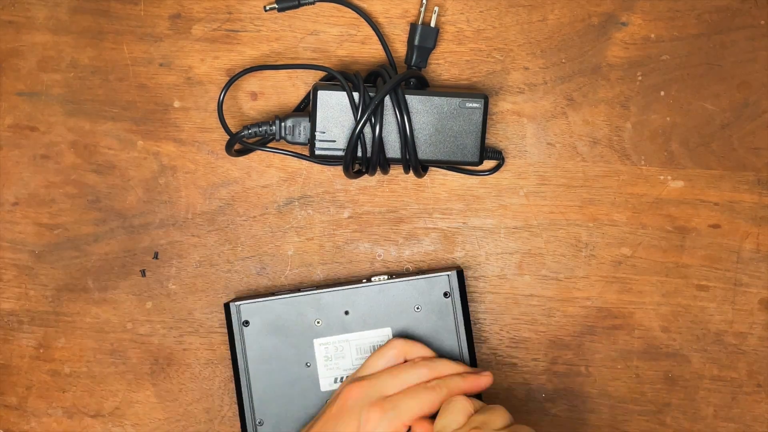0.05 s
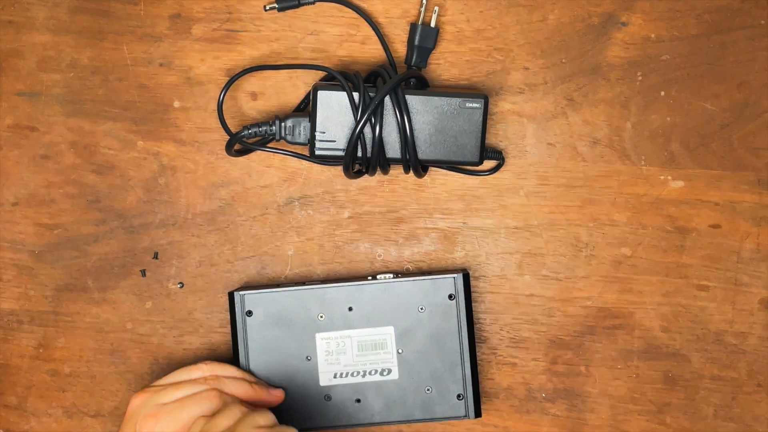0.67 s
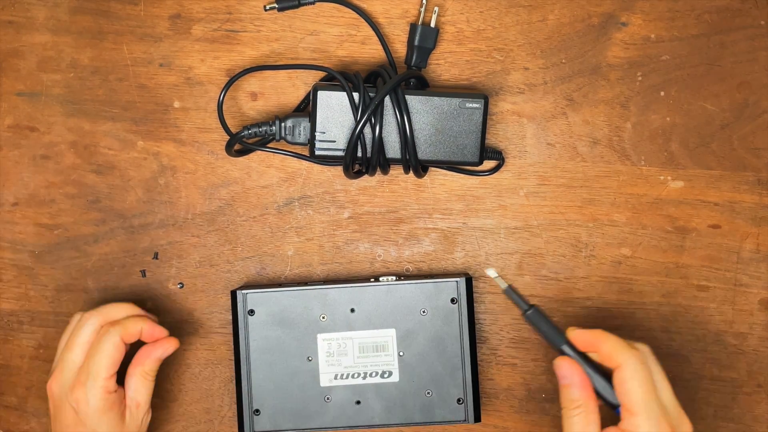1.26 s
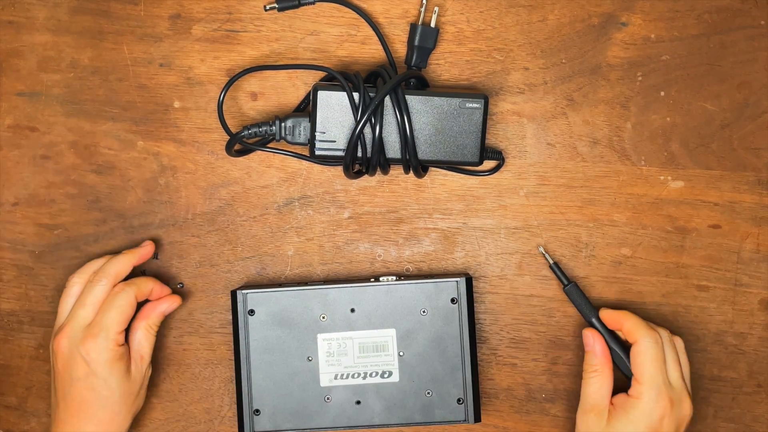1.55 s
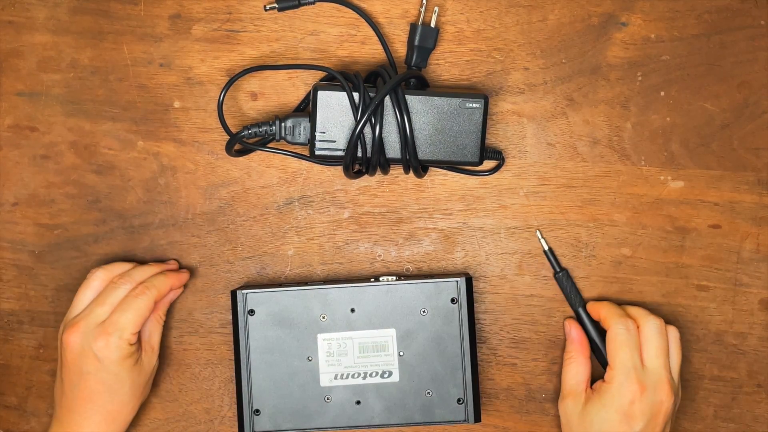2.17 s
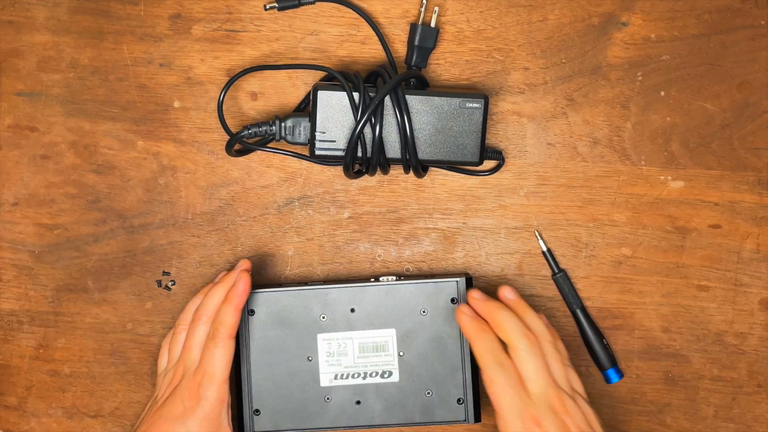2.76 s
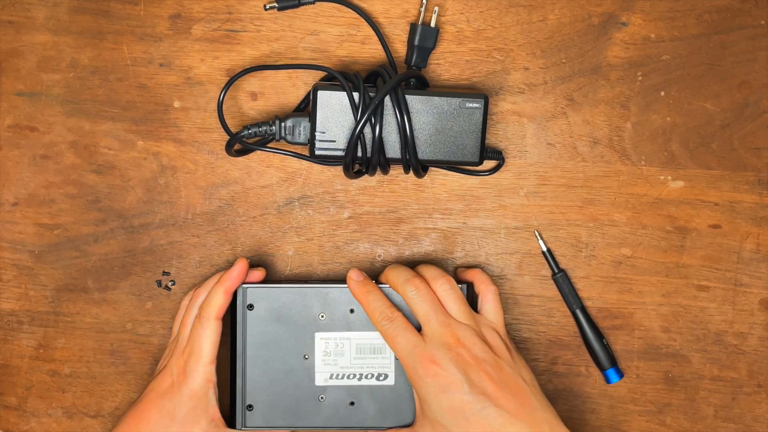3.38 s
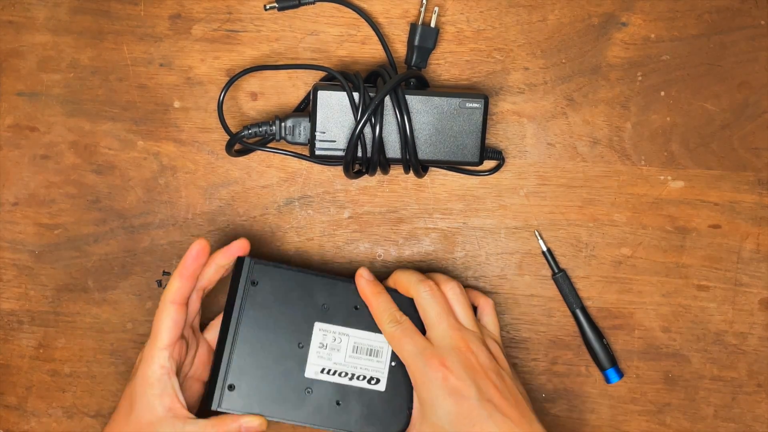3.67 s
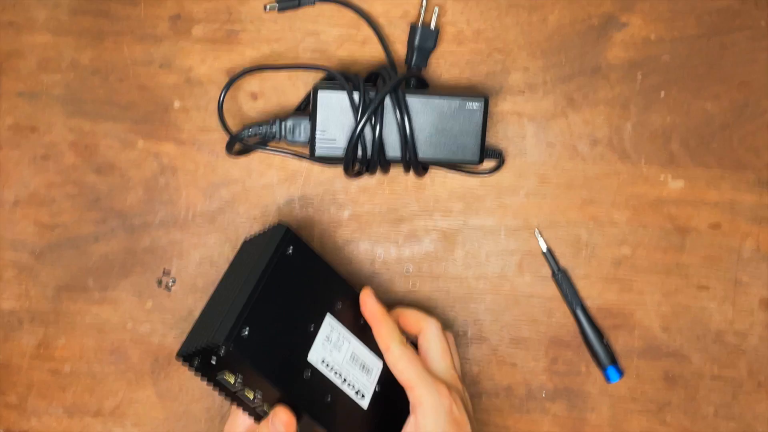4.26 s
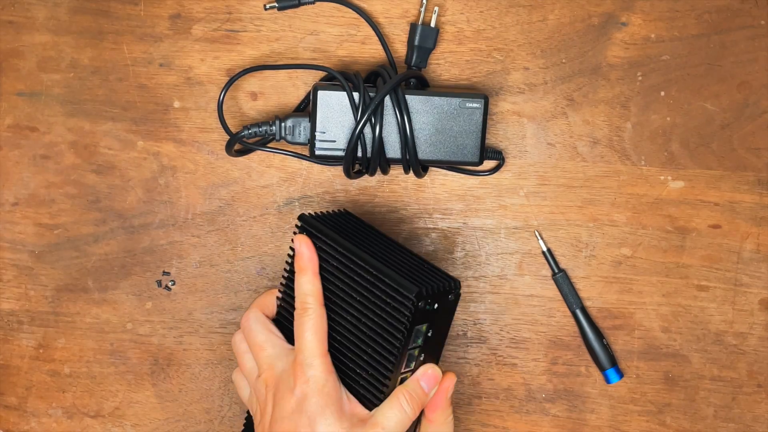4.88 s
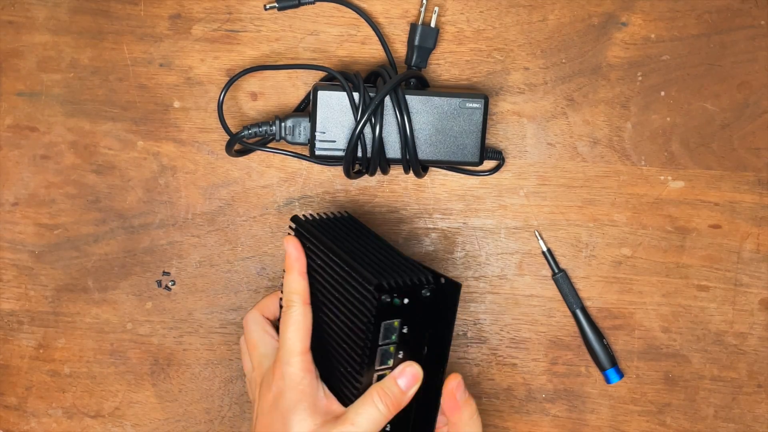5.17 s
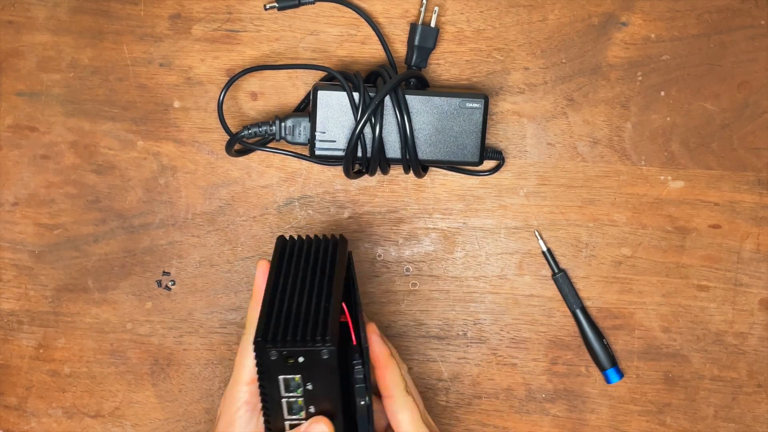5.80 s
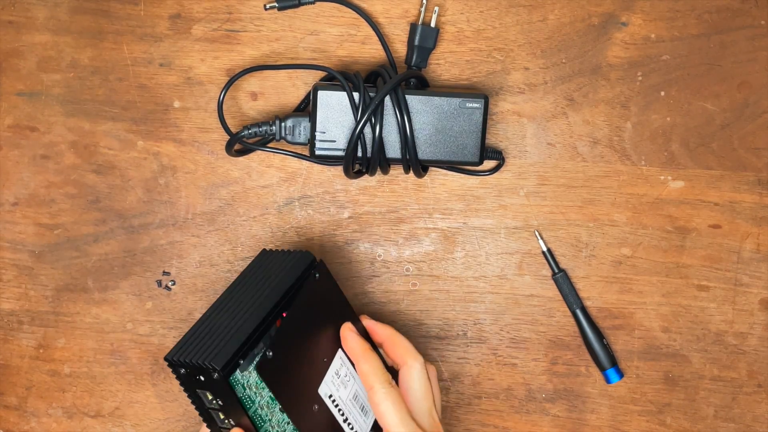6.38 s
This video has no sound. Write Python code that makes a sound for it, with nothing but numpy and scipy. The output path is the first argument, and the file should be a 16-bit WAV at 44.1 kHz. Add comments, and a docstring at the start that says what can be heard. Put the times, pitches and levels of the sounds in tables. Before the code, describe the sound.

Close up in a quiet room, small screws skitter over a wooden tabletop among light finger taps on a metal case. The loudest sound follows, a screwdriver knocking onto the wood. Then the case bumps on its feet, sticks and slips across the table and groans once, shortly, as it tilts. Dry skin brushes the shell, and a thin bottom plate comes free in a run of small scrapes and sharp, ringing clicks.

```python
"""A small finned metal computer case is taken apart on a wooden table, close up in a quiet room.
Fingers rub and tap its shell; screws and a screwdriver slide and knock on the wood, ringing the table top.
Pushed along, the case sticks and slips in a judder, then groans once as it is tipped up.
Last, its loose bottom plate scrapes and clicks out of the shell with the ring of thin sheet metal."""
import sys
import numpy as np
from scipy import signal
from scipy.fft import rfft, irfft, next_fast_len
from scipy.io import wavfile
from scipy.ndimage import map_coordinates

SR = 44100
rng = np.random.default_rng(int(sys.argv[2]) if len(sys.argv) > 2 else 0)


def generate_wav(sig):
    """Save sig (samples, or channels by samples) to the path in sys.argv[1] as 16-bit PCM at SR."""
    pcm = np.round(np.clip(np.atleast_2d(sig).T, -1, 1) * 32767).astype(np.int16)
    wavfile.write(sys.argv[1], SR, pcm)


N = 288414

# dark bed of room air: (frequency [Hz], level [dB]); table levels are relative, each layer has its own trim
AIR_SPECTRUM = [(20, -18.5), (45, 0), (75, 3.5), (130, 2.5), (250, -1), (500, -8), (900, -14), (1400, -15),
                (2200, -24), (5000, -29.5), (9000, -34.5), (15000, -36)]
# screws and screwdriver sliding on the wood: (start [s], length [s], level [dB])
PART_SLIDES = [(0.0, 0.2, -57.5), (0.197, 0.03, -51), (0.236, 0.024, -48), (0.27, 0.084, -59),
               (0.558, 0.021, -42.5), (0.755, 0.013, -46), (0.866, 0.13, -47), (1.058, 0.081, -59),
               (2.01, 0.17, -61.5), (2.12, 0.02, -53)]
# body of those slides: (frequency [Hz], bandwidth [Hz], level [dB])
SLIDE_MODES = [(416, 49, 11), (810, 48, 7), (950, 88, -5.5), (1240, 230, -9), (1520, 170, -9.5),
               (2820, 320, -20), (4516, 300, -29)]
# strokes of skin over the case: (centre [s], level [dB], half width [s])
SKIN_STROKES = [(0.01, -49.5, 0.011), (0.06, -59, 0.015), (0.29, -68.5, 0.046), (0.598, -58.5, 0.015),
                (0.665, -62, 0.025), (1.70, -69.5, 0.038), (1.79, -65, 0.025), (1.96, -66, 0.042),
                (2.58, -75, 0.12), (2.69, -60, 0.021), (2.77, -60, 0.052), (2.90, -75, 0.11),
                (3.06, -57.5, 0.049), (3.16, -73, 0.03), (3.52, -63, 0.045), (3.94, -64.5, 0.067),
                (4.13, -75, 0.033), (4.29, -52, 0.032), (4.45, -69, 0.011), (4.61, -69, 0.064),
                (4.99, -65.5, 0.038)]
# dry friction hiss: (frequency [Hz], level [dB])
HISS_SPECTRUM = [(200, -8.5), (900, -0.5), (2000, 4.5), (3500, 1.5), (5500, -2.5), (7500, -4.5),
                 (10000, -9.5), (13000, -16.5), (15500, -8)]
# airy whisper of fingertips creeping over the fins: (frequency [Hz], level [dB])
CREEP_SPECTRUM = [(3000, -27), (6500, -10), (8000, -0.5), (10500, -4), (13000, -7.5), (15500, -1)]
# hands shifting their grip: (start [s], length [s], level [dB])
GRIP_SHIFTS = [(2.418, 0.36, -66.5), (2.661, 1.35, -62.5), (4.375, 0.65, -68)]
# fingers landing on the case: (time [s], level [dB], thump offset [dB], nail offset [dB])
FINGER_TAPS = [(0.043, -44, -2.5, -11), (0.1519, -57, 16, -42), (0.2528, -46.5, 2.5, -24),
               (0.5582, -54.5, 14, -47), (0.607, -36, 7.5, -22), (0.624, -40.5, 2, -11),
               (0.7567, -55.5, 14, -26), (1.9016, -47.5, -27.5, -17.5), (1.9162, -43.5, -31.5, 2.5),
               (2.414, -50, -3, -7), (2.6486, -39, 5.5, -36), (2.7186, -35.5, 3, -26.5),
               (3.0075, -25, -4, -23), (4.7339, -41.5, -12, -35), (4.799, -50, 4.5, -38),
               (4.9405, -30, -8, -6), (5.288, -47.5, -26, -18), (5.317, -56, -21, -8),
               (5.3538, -44, -3.5, -27)]
# snap of a light contact, fingertip or screw: (frequency [Hz], level [dB])
SLAP_SPECTRUM = [(200, -7.5), (900, -1.5), (2000, 1), (3500, -2.5), (5500, -11.5), (7500, -10),
                 (10000, -15), (13000, -24.5), (15500, -19)]
# thump of the case under a finger: (frequency [Hz], bandwidth [Hz], level [dB])
THUMP_MODES = [(256, 55, -2.5), (413.5, 9.3, -3), (565, 190, -6.5), (789, 160, -1), (938, 30, -1),
               (1286, 51, -7.5)]
# bright edge of a fingernail: (frequency [Hz], level [dB])
NAIL_SPECTRUM = [(500, -26), (2500, -11), (5000, 12), (7500, 13), (10000, 8.5), (13000, -2.5),
                 (15500, -0.5)]
# screwdriver and case hitting the table: (time [s], level [dB], contact time [s], gate length [s])
TABLE_KNOCKS = [(0.2420, -39.5, 0.0015, 0.048), (0.57, -39, 0.00042, 0.016), (0.6224, -29.5, 0.00026, 0.18),
                (1.1491, -28, 0.0015, 0.011), (1.1590, -31, 0.0022, 0.0088), (2.1865, -11.5, 0.00067, 0.36),
                (2.2001, -21, 0.0014, 0.38), (2.2116, -34.5, 0.0022, 0.26), (3.0130, -34, 0.0014, 0.126),
                (4.2328, -36.5, 0.00073, 0.091), (4.2775, -33, 0.0016, 0.082), (4.364, -41, 0.0035, 0.087)]
# ring of the table top: (frequency [Hz], level [dB], t60 [s])
WOOD_MODES = [(262, -31.5, .05), (385, -14, 0.041), (662, -16, 0.06), (722.4, -11.5, 0.055),
              (813.5, -6, 0.068), (891, -12, 0.13), (1114, 1, 0.028), (1340, -0.5, 0.025), (1450, 0, 0.03),
              (1560, 0, 0.017), (1788, -9, 0.058), (2110, -5, 0.02), (2360, -12, 0.022), (2600, -3, 0.062),
              (2913, -13.5, 0.067)]
# crack of the wood's dense weak modes: (frequency [Hz], level [dB])
CRACK_SPECTRUM = [(150, -11), (400, -3), (800, -2), (1500, 0.5), (2700, -8), (3300, -24), (5500, -28),
                  (7500, -42.5), (12000, -43.5), (15500, -39.5)]
# boom of the whole table flexing: (frequency [Hz], bandwidth [Hz], level [dB])
BOOM_MODES = [(75.5, 18, -4), (137, 25, -4.5)]
# ticks that stop dead: (time [s], level [dB], length [s])
DRY_TICKS = [(0.5087, -63.5, 0.0016), (0.709, -42.5, .005), (0.8580, -71, 0.0014), (1.062, -69, 0.0016),
             (1.125, -68.5, 0.0068), (1.1660, -53.5, .002), (3.816, -63, .004)]
# their tone: (frequency [Hz], level [dB])
TICK_SPECTRUM = [(200, 2), (2000, 8.5), (6000, 3), (10000, 6), (15000, -15.5)]
# the case pushed over the wood: (start [s], length [s], effort [dB])
CASE_PUSHES = [(0.618, 0.033, -41.5), (3.19, 0.34, -51), (3.42, 0.21, -43.5), (3.855, 0.11, -44),
               (4.335, 0.027, -47)]
# body of the case standing on the table: (frequency [Hz], bandwidth [Hz], level [dB])
CASE_MODES = [(348.6, 43.4, 0.5), (408, 46.3, 0.5), (634, 45, -8), (740, 28, -5.5), (914, 57, -8.5),
              (1256, 44, -16.5), (1600, 120, -23)]
# gritty ring of its fins: (frequency [Hz], bandwidth [Hz], level [dB])
FIN_MODES = [(1945, 250, -6), (2380, 150, 0), (2670, 62, 5.5), (3167, 100, 3.5), (3440, 200, -7),
             (3820, 360, -10.5), (4330, 220, -11), (4920, 180, -9), (5320, 130, -10.5)]
# handling rumble through the table: (frequency [Hz], level [dB])
RUMBLE_SPECTRUM = [(30, -12), (70, 2.5), (120, 3), (200, -2), (330, -1.5), (550, -6), (800, -16),
                   (1500, -21.5), (4000, -50)]
# the case rocking on its feet: (time [s], level [dB])
FOOT_BUMPS = [(0.646, -38), (0.672, -50.5), (2.834, -47), (2.879, -45), (2.914, -41.5), (2.948, -47.5),
              (3.072, -47.5), (3.115, -49), (3.748, -54), (4.109, -47)]
# dull body of a bump: (frequency [Hz], bandwidth [Hz], level [dB])
BUMP_MODES = [(114, 63, -36.5), (410, 326, 3.5), (605, 142, 4.5)]
# a screw set down: (time [s], level [dB])
SCREW_HITS = [(1.6287, -39)]
# ring of the screw on the wood: (frequency [Hz], level [dB], t60 [s])
SCREW_MODES = [(432, 5, 0.17), (1056, -1.5, 0.12), (1770, -26, 0.088), (2480, -26, .08), (3040, -4, 0.096),
               (3040, -6, 0.083), (2750, -2, 0.11), (3800, -12, 0.1), (6200, -17, 0.22)]
# the bottom plate scraping: (centre [s], level [dB], half width [s])
PLATE_SCRAPES = [(5.185, -57, 0.023), (5.575, -52, 0.021), (5.718, -54.5, 0.0053), (5.818, -46, 0.0136),
                 (5.91, -57, 0.0132), (6.063, -45.5, 0.0135), (6.29, -54, 0.024), (6.382, -51.5, 0.017)]
# the plate catching in the shell: (time [s], level [dB], t60 [s])
PLATE_CLICKS = [(5.7001, -45, 0.026), (5.7317, -23.5, 0.015), (5.7975, -41.5, 0.054), (6.051, -53, 0.021),
                (6.0760, -41, 0.025), (6.1655, -30, 0.0235), (6.2065, -45, 0.038), (6.2711, -39.5, 0.013),
                (6.4878, -41, 0.019)]
# the freed plate rubbing faintly: (start [s], length [s], level [dB])
PLATE_SHIFTS = [(5.75, 0.147, -66.5), (6.07, 0.062, -69), (6.25, 0.2, -66)]
# ring of its thin sheet: (frequency [Hz], bandwidth [Hz], level [dB])
PLATE_MODES = [(981, 17, -3), (1385, 54, 1), (1547, 13, -10), (2150, 50, 4.5), (2330, 88, 2),
               (2748, 98, 4.5), (3110, 100, 0), (3540, 75, 3), (4650, 80, 4), (5076, 400, -2),
               (5610, 110, -0.5), (6020, 99, 1.5), (7550, 230, 4.5), (8370, 220, -2.5), (9300, 360, -7),
               (10700, 400, -6), (11950, 400, -12.5), (14120, 980, -13)]
# its drag, a softer and darker contact than a catch: (frequency [Hz], level [dB])
DRAG_SPECTRUM = [(200, 9.5), (1000, 4.5), (3000, -3), (6000, -3.0), (10000, -1.0), (15000, -1)]
# decay of the room tail: (frequency [Hz], t60 [s])
ROOM_DECAY = [(100, 1), (500, 0.29), (1500, 0.37), (3000, 0.33), (6000, 0.17), (14000, 0.14)]
# stereo width of the tail: (frequency [Hz], side level [dB])
ROOM_WIDTH = [(60, -11), (280, -2.5), (600, 4), (1300, 7), (2200, -4), (5000, -34.5), (14000, -17.5)]
# phase between the channels: (frequency [Hz], lag of the left [rad])
STEREO_LAG = [(20, 0), (2200, .05), (3200, .5), (4400, .3), (6000, 1.2), (7000, 3.05), (8400, 3.2),
              (10900, 6.2), (12500, 6.4), (14000, 9.3), (16000, 9.5)]
# balance between the channels: (frequency [Hz], left over right [dB])
STEREO_TILT = [(60, -.2), (300, -.4), (900, -1.2), (2400, 0), (4500, -2), (5700, -3), (7500, .3),
               (12000, .3), (15000, 2)]

GRIP_ATTACK_S = 0.02


def amp(db):
    return 10 ** (np.asarray(db) / 20)


def unit(x):
    return x / np.sqrt(np.mean(x ** 2) + 1e-20)


def along(points, hz):
    """Read a (frequency, value) curve on a log frequency axis."""
    f, v = np.transpose(points)
    return np.interp(np.log(hz + 1), np.log(f + 1), v)


def seconds(size):
    return np.arange(size) / SR


def wobble(rate):
    """A smooth random curve, rate knots a second."""
    return map_coordinates(rng.standard_normal(int(N * rate / SR) + 4), [np.arange(N) * rate / SR])


def filtered(x, response):
    """x times a complex frequency response."""
    n = x.shape[-1]
    m = next_fast_len(n + SR // 4)
    return irfft(rfft(x, m) * response(np.fft.rfftfreq(m, 1 / SR)), m)[..., :n]


def coloured(x, spectrum):
    """x through a smooth EQ curve of unit power."""
    return filtered(x, lambda f: unit(amp(along(spectrum, f))))


def resonate(x, modes):
    """x through a body's resonances, of unit power together."""
    def response(f):
        h = sum((-1) ** k * amp(db) * 1j * f * width / (hz * hz - f * f + 1j * f * width)
                for k, (hz, width, db) in enumerate(modes))
        return h / np.sqrt(np.mean(np.abs(h) ** 2))
    return filtered(x, response)


def add(track, start, x):
    """Mix x into track from start seconds."""
    part = track[..., max(round(start * SR), 0):][..., :x.shape[-1]]
    part += x[..., :part.shape[-1]]


def burst(t60, rise):
    """The noisy transient of one contact, dying away."""
    t = seconds(SR // 4)
    return rng.standard_normal(len(t)) * amp(-60 * t / t60) * (1 - np.exp(-t / rise))


def friction(rate, smooth_db):
    """Irregular slips of random size over a smooth hiss, rms 1."""
    slips = (rng.random(N) < rate / SR) * rng.standard_normal(N)
    return unit(unit(slips) + amp(smooth_db) * rng.standard_normal(N))


def swell(t, centre, half_width):
    """Bell-shaped pressure of one stroke."""
    return np.exp(-((t - centre) / half_width) ** 2 / 2)


def held(start, length, attack, release):
    """Envelope of one move: rise, hold, die away; all in seconds, release is a t60."""
    since = seconds(N) - start
    return np.clip(since / attack, 0, 1) * amp(-60 * np.maximum(since - length, 0) / release)


def moves(rows, attack, release):
    """Power sum of the envelopes of (start, length, level) moves."""
    return np.sqrt(sum((amp(db) * held(start, length, attack, release)) ** 2 for start, length, db in rows))


def in_room(x, wet_db, wide_db=-3):
    """x in the centre, with a short stereo room tail after a 5 ms pre-delay."""
    hz, t, noise = signal.stft(rng.standard_normal((2, SR // 2)), SR, nperseg=256)
    tails = signal.istft(noise * amp(-60 * t / along(ROOM_DECAY, hz)[:, None]), SR, nperseg=256)[1]
    tails = np.pad(tails / np.linalg.norm(tails[0]), ((0, 0), (SR // 200, 0)))
    mid, side = signal.fftconvolve(x[None], tails, axes=1)[:, :len(x)]
    side = filtered(side, lambda f: amp(wide_db + along(ROOM_WIDTH, f)))
    return x + amp(wet_db) * np.array([mid + side, mid - side])


def room_tone():
    """The room's air lays a low, steady bed under everything."""
    mid, side = coloured(rng.standard_normal((2, N)), AIR_SPECTRUM)
    return amp(-72) * (mid + amp(-8.5) * np.array([side, -side]))


def part_slides():
    """Small parts chatter across the grain of the wood."""
    grain = unit(resonate(friction(rate=1200, smooth_db=-9), SLIDE_MODES))
    motion = moves(PART_SLIDES, attack=0.008, release=0.09)
    return in_room(amp(-5.5) * motion * grain, wet_db=-10.5)


def skin_rubs():
    """Dry skin hisses unevenly over painted metal; a shifting grip adds a thin, high whisper."""
    hiss = coloured(friction(rate=660, smooth_db=7), HISS_SPECTRUM) * amp(1.1 * wobble(35))
    creep = coloured(friction(rate=900, smooth_db=4), CREEP_SPECTRUM) * amp(3.3 * wobble(12))
    pressure = sum(amp(db) * swell(seconds(N), centre, half) for centre, db, half in SKIN_STROKES)
    gripping = sum(held(start, length, GRIP_ATTACK_S, release=0.45) for start, length, _ in GRIP_SHIFTS)
    return in_room(amp(-4.5) * pressure * hiss + amp(-82.5) * gripping * creep, wet_db=-20)


def finger_taps():
    """A fingertip slaps the metal and rings the plate's low modes; the nail clicks, the case thumps."""
    slaps, thumps, nails = np.zeros((3, N))
    for time, db, thump_db, nail_db in FINGER_TAPS:
        add(slaps, time - .001, amp(db - 7.5) * burst(t60=.05, rise=0.00089))  # short, dies away quickly
        add(thumps, time, amp(db + thump_db + 0.5) * burst(t60=0.032, rise=0.0027))
        add(nails, time - .001, amp(db + nail_db - 0.5) * burst(t60=.03, rise=0.0011))
    attack = coloured(slaps, SLAP_SPECTRUM) + coloured(nails, NAIL_SPECTRUM)
    body = amp(-8.5) * resonate(slaps, PLATE_MODES[:7]) + resonate(thumps, THUMP_MODES)
    return in_room(attack + body, wet_db=-10.5)


def table_knocks():
    """Each hit rings, cracks and flexes the table top; a longer contact reaches only the low modes."""
    out, t = np.zeros((2, N)), seconds(SR // 4)
    modes = sum((-1) ** k * amp(level - 60 * t / t60) * np.sin(2 * np.pi * hz * t)
                for k, (hz, level, t60) in enumerate(WOOD_MODES))
    for time, db, contact, length in TABLE_KNOCKS:
        force = np.sin(np.pi * np.clip(t / contact, 0, 1)) ** 2
        ring = signal.fftconvolve(modes, force)[:len(t)]
        ring = ring / np.abs(ring).max()
        hardness = min(0.00087 / contact, 1)
        crack = hardness * coloured(burst(t60=.04, rise=0.0016), CRACK_SPECTRUM)
        flex = amp(-22) * resonate(burst(t60=0.022, rise=0.0011), BOOM_MODES)
        hit = in_room(ring, wet_db=-15) + amp(-12) * in_room(crack, wet_db=-6, wide_db=-2) + flex
        gate = np.clip((length - t) / 0.0016, 0, 1)
        add(out, time, amp(db) * hit * gate)
    return out * amp([[-1], [1]])  # panned a touch right


def dry_ticks():
    """Tiny bright snaps of noise with no tail."""
    out = np.zeros(N)
    for time, db, length in DRY_TICKS:
        add(out, time, amp(db) * rng.standard_normal(int(length * SR) + 1))
    return coloured(out, TICK_SPECTRUM)


def case_pushes(firm_db=-48.5, grit_growth=1.32):
    """The case sticks and slips on the wood, shaking table and fins over the rumble of the hands."""
    effort = moves(CASE_PUSHES, attack=0.027, release=0.16)
    slips = friction(rate=500, smooth_db=-1.5) * amp(3 * wobble(45))
    judder = amp(-3) * effort * unit(resonate(slips, CASE_MODES))
    boom = amp(-7) * effort * unit(resonate(slips, BOOM_MODES))
    bite = (effort / amp(firm_db)) ** grit_growth  # the grit grows faster than the effort
    grit = amp(firm_db - 21) * bite * unit(resonate(slips, FIN_MODES))
    return in_room(judder + boom + grit + hand_rumble(effort), wet_db=-9.5)


def hand_rumble(effort):
    """Hands send low end through the table as they push or shift their grip."""
    gripping = moves(GRIP_SHIFTS, GRIP_ATTACK_S, release=0.94)
    rumble = coloured(friction(rate=200, smooth_db=1.5), RUMBLE_SPECTRUM)
    return (amp(3) * gripping + amp(-23.5) * effort) * rumble


def foot_bumps(cutoff_hz=900):
    """The case rocks on feet too soft to pass any treble."""
    force = np.zeros(N)
    for time, db in FOOT_BUMPS:
        add(force, time, amp(db + 8) * burst(t60=0.03, rise=0.0011))
    force = filtered(force, lambda f: 1 / (1 + (f / cutoff_hz) ** 4))
    return in_room(resonate(force, BUMP_MODES), wet_db=-8.5)


def screw_hits():
    """A small steel screw snaps onto the wood and rings briefly."""
    out, t = np.zeros(N), seconds(SR // 3)
    ring = sum(amp(level - 60 * t / t60) * np.sin(2 * np.pi * hz * t) for hz, level, t60 in SCREW_MODES)
    for time, db in SCREW_HITS:
        add(out, time, amp(db - 10.5) * ring)
        add(out, time, amp(db - 0.5) * coloured(burst(t60=0.039, rise=0.00025), SLAP_SPECTRUM))
    return in_room(out, wet_db=-9)


def case_groan(start=4.2315, length=0.097, slip_hz=390, sag=.04, table_hz=80.3):
    """The tipped edge slips at a near-steady pitch; as the weight peaks it sags and the table sways."""
    t = seconds(N)
    weight = np.sin(np.pi * np.clip((t - start) / length, 0, 1)) ** 2
    rate = slip_hz * (1 - sag * weight) * (1 + .035 * wobble(160))
    cycles = np.cumsum(rate * (t > start)) / SR
    slips = unit(np.diff(np.floor(cycles), prepend=0) * amp(4.5 * wobble(150)))
    rough = friction(rate=650, smooth_db=3.5)
    # the case rocks smoothly once a slip; the snap of each slip rings its higher modes
    rocking = unit(np.sin(2 * np.pi * cycles) * amp(wobble(70)))
    overtones = unit(resonate(slips + .5 * rough, CASE_MODES[2:]))
    body = unit(rocking + amp(-11.5) * overtones + amp(-7) * resonate(rough, CASE_MODES))
    fins = unit(resonate(.5 * slips + rough, FIN_MODES))
    groan = amp(-33 - 4.5 * weight) * body + amp(-55) * fins  # the body ducks under full weight
    sway = unit(np.sin(2 * np.pi * table_hz * t) + amp(-9) * resonate(rough, BOOM_MODES))
    sliding = held(start, length, attack=0.0062, release=0.1)
    swaying = held(start, length=.055, attack=.045, release=.33)
    return in_room(sliding * groan + amp(-36) * swaying * sway, wet_db=-18.5)


def sheet_ring(force):
    """Each touch lands elsewhere on the gripped sheet, so its modes vary in level and a little in pitch."""
    chance = rng.standard_normal((len(PLATE_MODES), 2))
    modes = [(hz * (1 + .007 * detune), width, db + 2 * lift)
             for (hz, width, db), (detune, lift) in zip(PLATE_MODES, chance)]
    return amp(-3.5) * resonate(force, modes) + amp(-11) * coloured(force, HISS_SPECTRUM)


def bottom_plate():
    """The plate scrapes, catches and rubs in the shell; all of it rings the same thin sheet."""
    drag = coloured(friction(rate=820, smooth_db=-3.5) * amp(2.47 * wobble(70)), DRAG_SPECTRUM)
    out = sheet_ring(moves(PLATE_SHIFTS, attack=0.058, release=0.66) * drag)
    for centre, db, half in PLATE_SCRAPES:
        start = centre - .1  # lead-in for the swell
        scrape = drag[round(start * SR):][:SR // 4]
        pressure = amp(db) * swell(start + seconds(len(scrape)), centre, half)
        add(out, start, sheet_ring(pressure * scrape))
    for time, db, t60 in PLATE_CLICKS:
        add(out, time - .001, sheet_ring(amp(db + 3) * burst(t60, rise=0.0012)))
    return in_room(out, wet_db=-14, wide_db=1)


def scene():
    """The stereo mix: hits and friction over the room's bed."""
    hits = table_knocks() + finger_taps() + foot_bumps() + dry_ticks() + screw_hits()
    rubbing = case_pushes() + case_groan() + part_slides() + skin_rubs()
    return hits + rubbing + bottom_plate() + room_tone()


def record(dry, top_hz=15850):
    """Two microphone ports set the channels apart in phase and level; the very top is cut off."""
    def ports(f):
        left = amp(along(STEREO_TILT, f) / 2) * np.exp(-1j * along(STEREO_LAG, f) / 2)
        return np.array([left, 1 / left]) * (f < top_hz)
    return filtered(dry, ports)


dry = scene()
out = record(dry)
generate_wav(out)
```